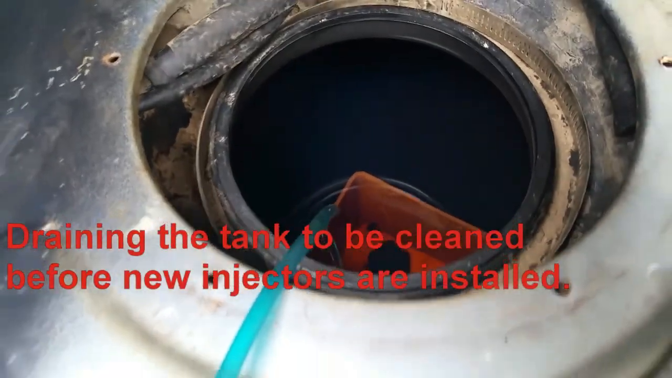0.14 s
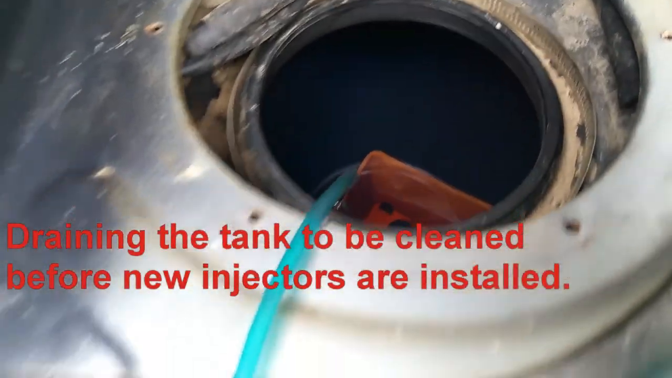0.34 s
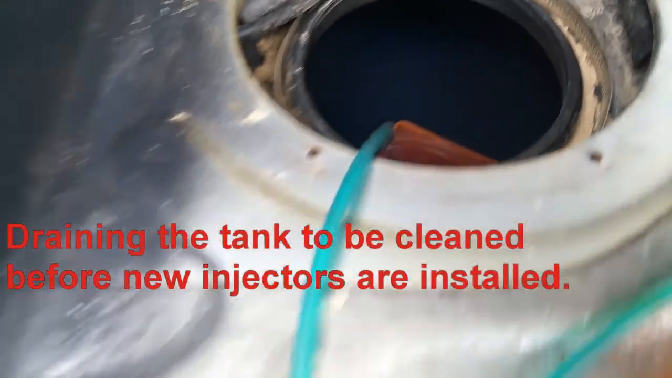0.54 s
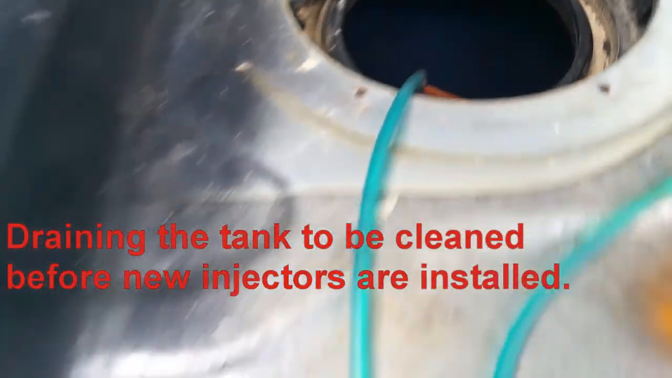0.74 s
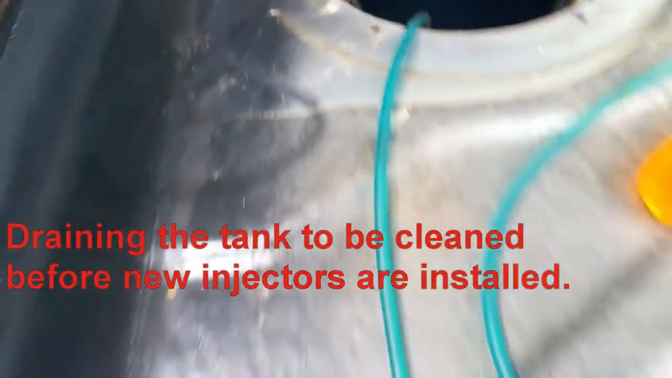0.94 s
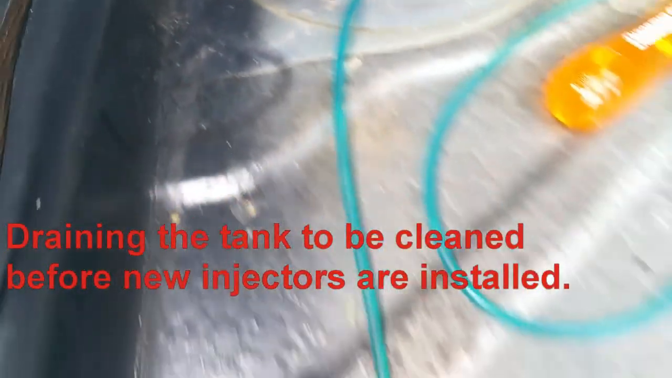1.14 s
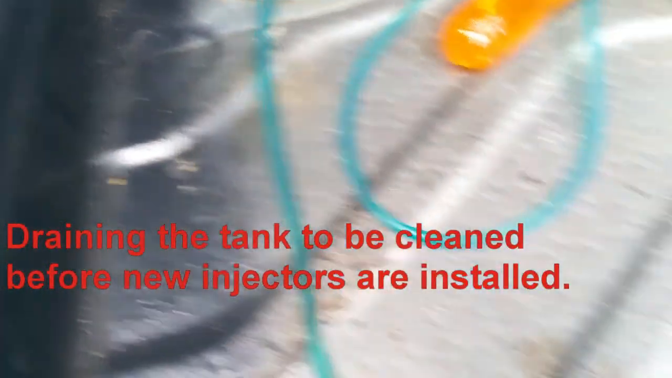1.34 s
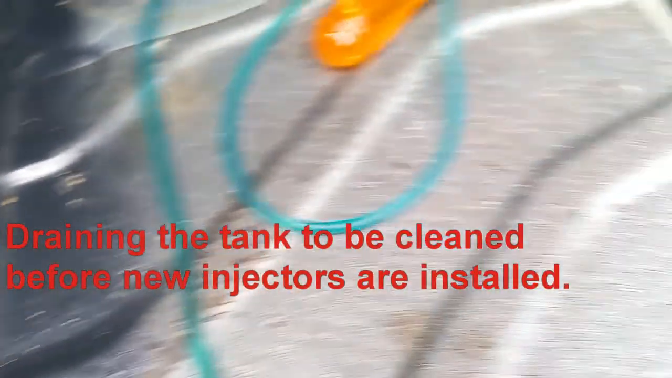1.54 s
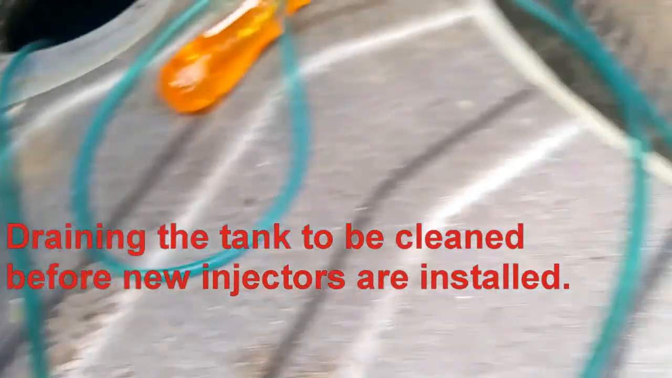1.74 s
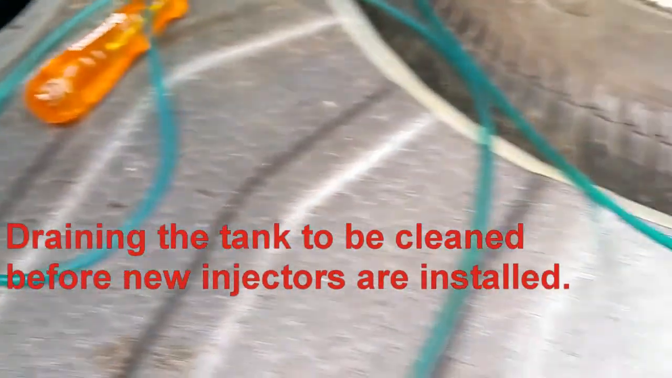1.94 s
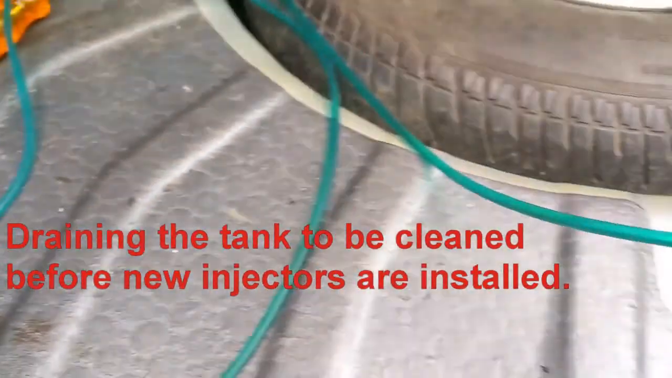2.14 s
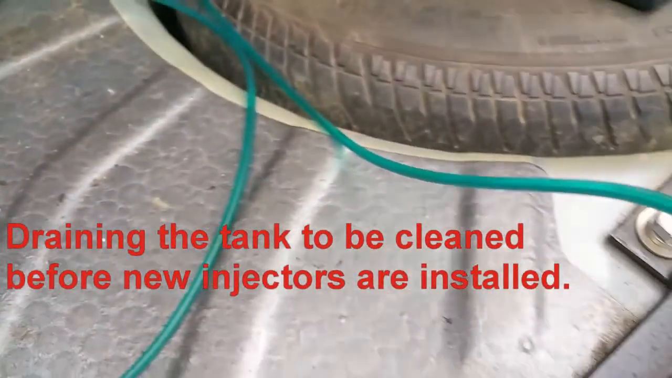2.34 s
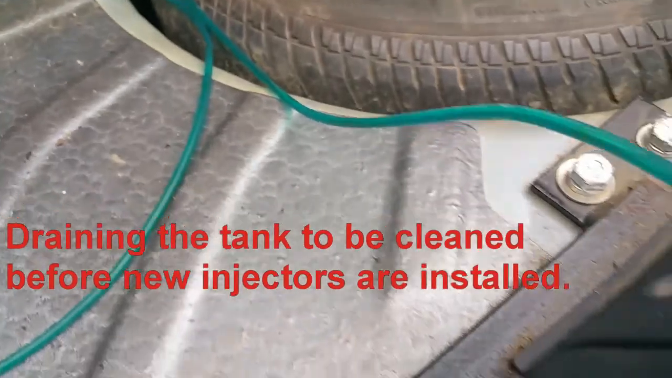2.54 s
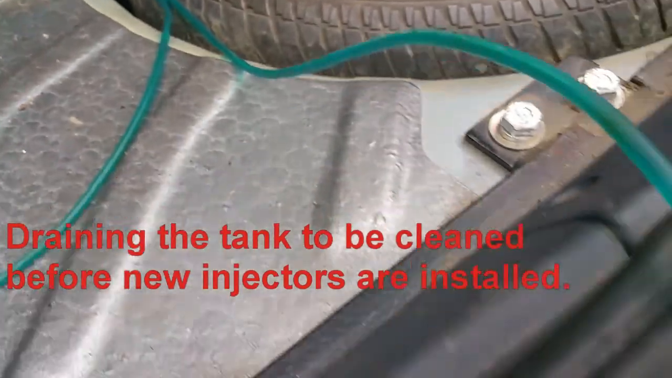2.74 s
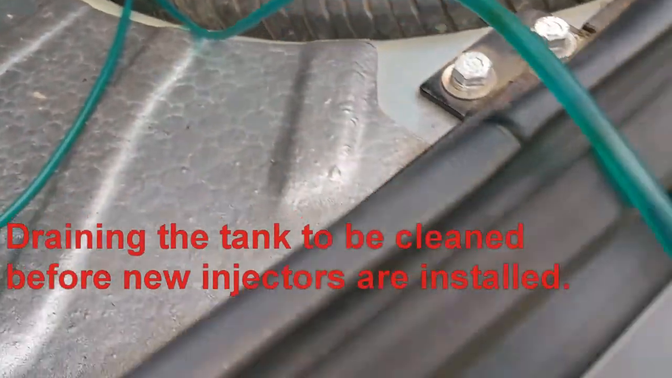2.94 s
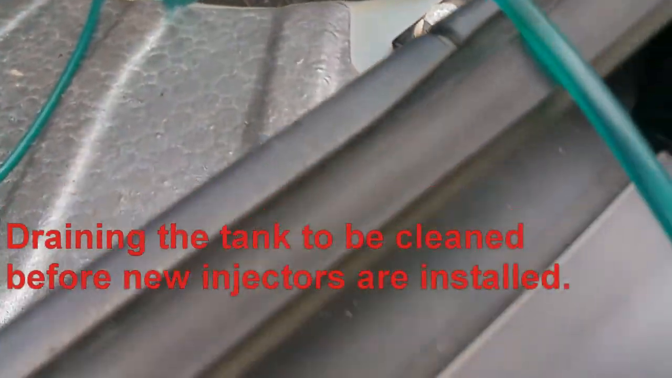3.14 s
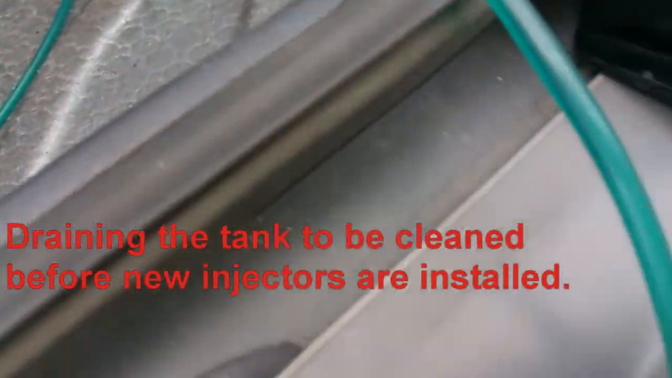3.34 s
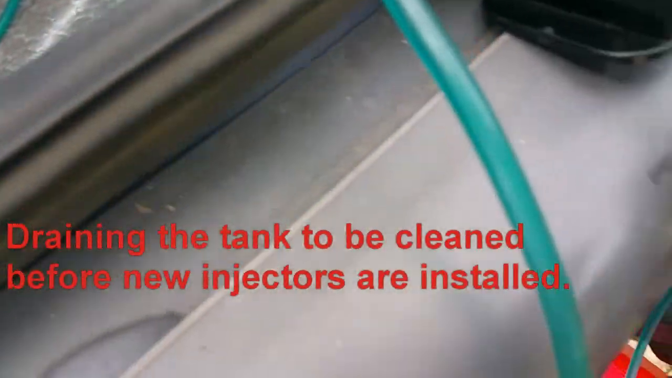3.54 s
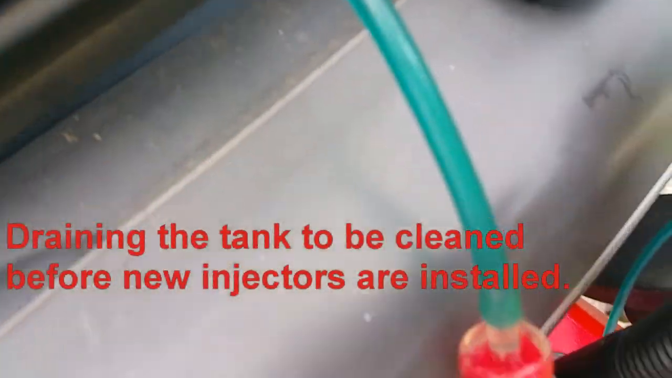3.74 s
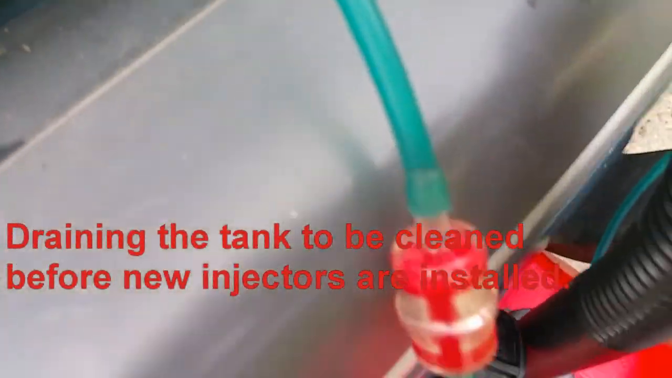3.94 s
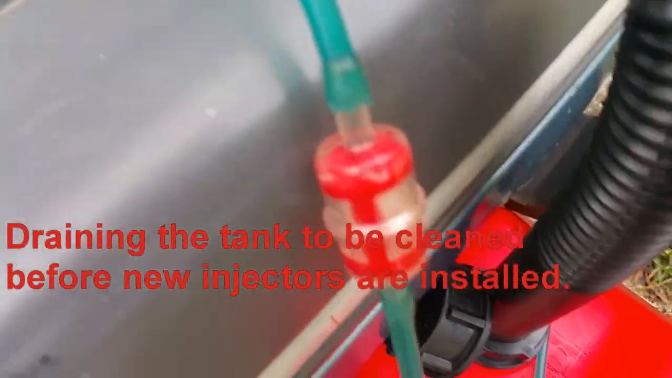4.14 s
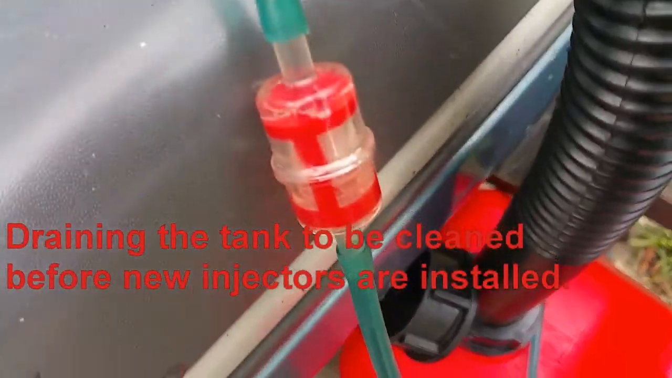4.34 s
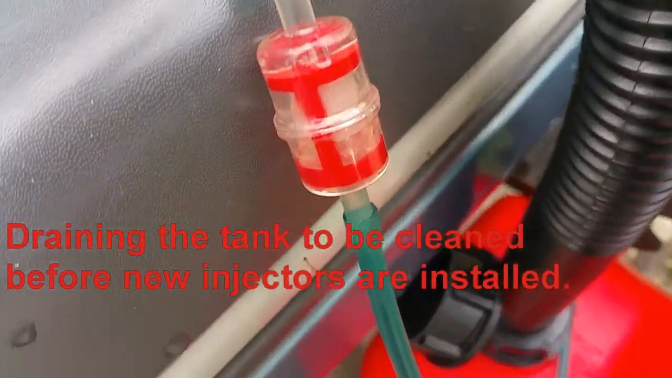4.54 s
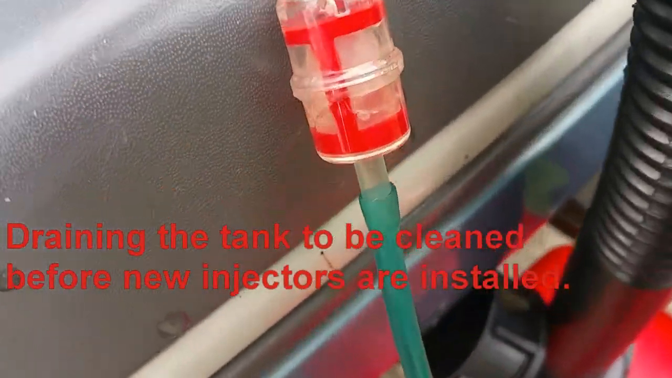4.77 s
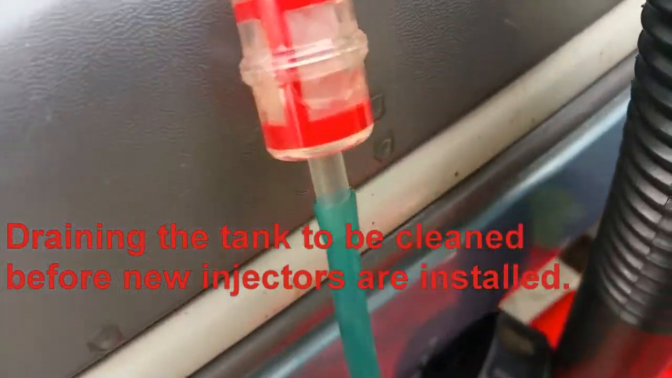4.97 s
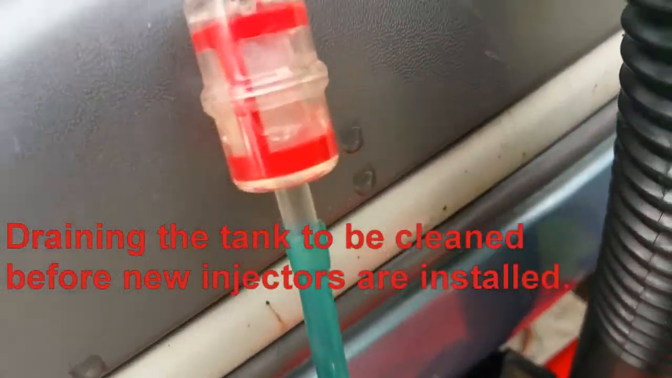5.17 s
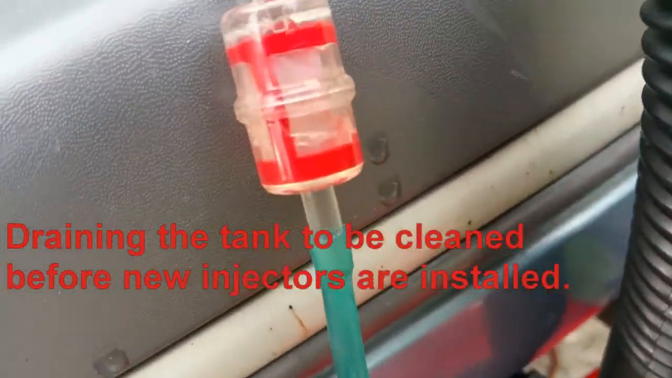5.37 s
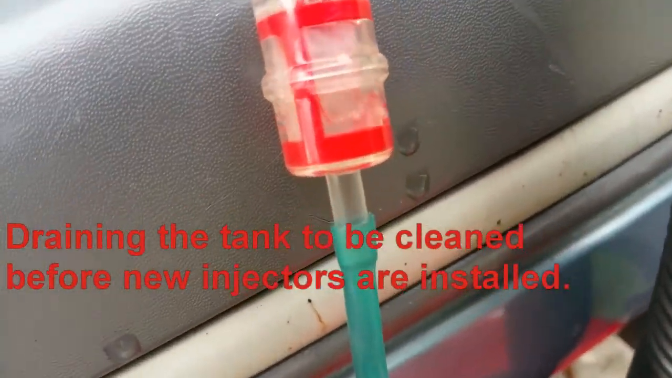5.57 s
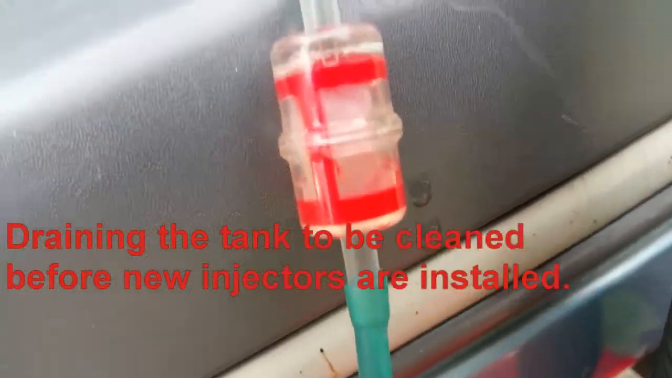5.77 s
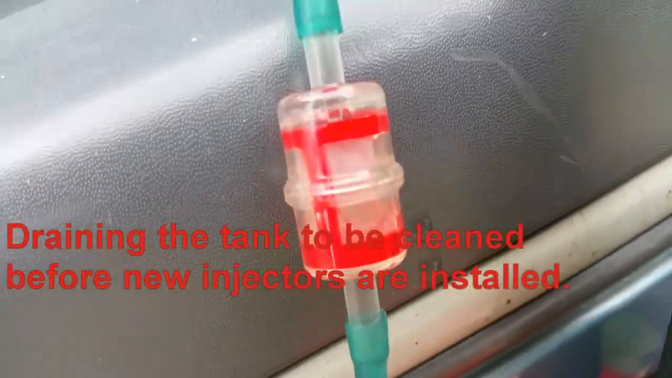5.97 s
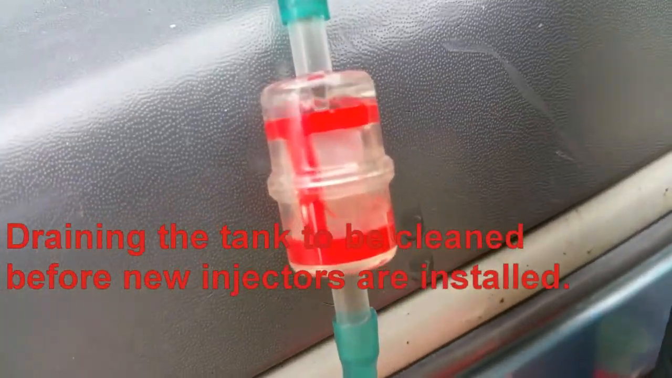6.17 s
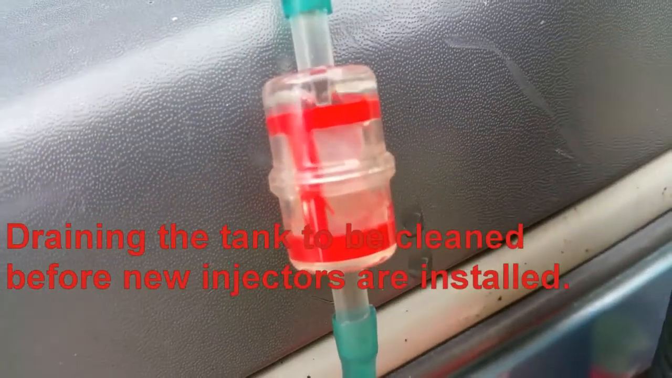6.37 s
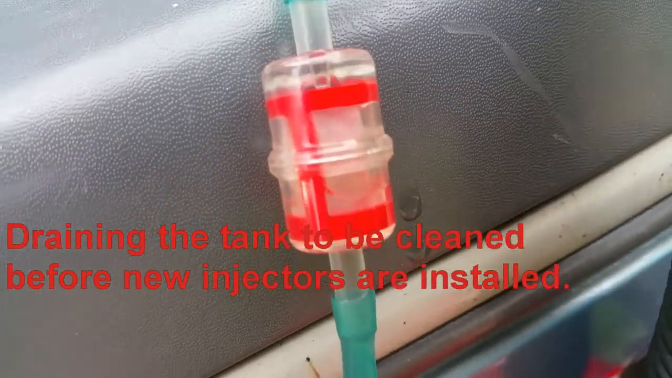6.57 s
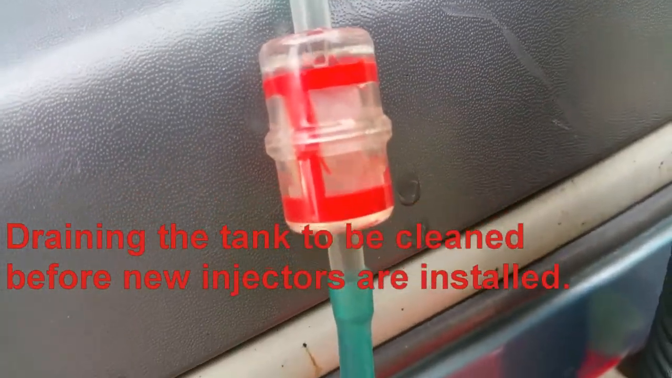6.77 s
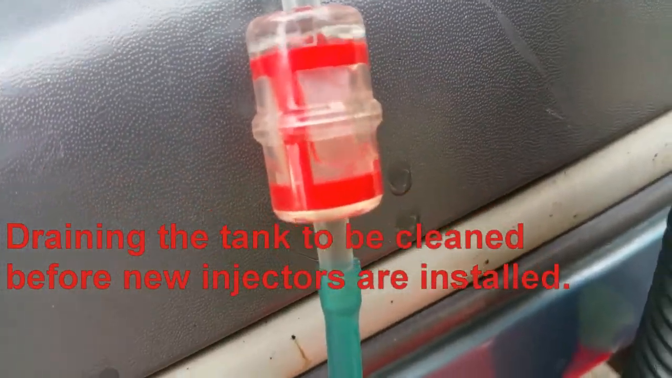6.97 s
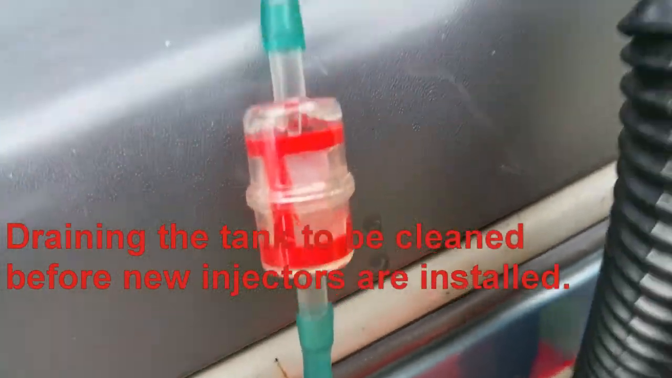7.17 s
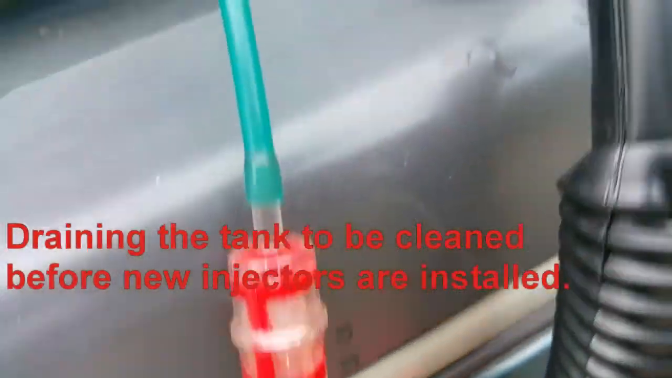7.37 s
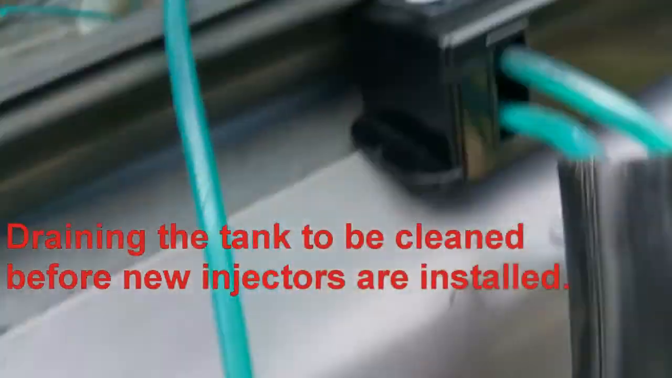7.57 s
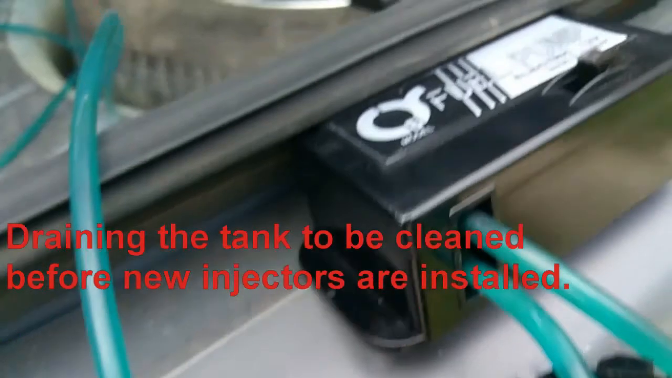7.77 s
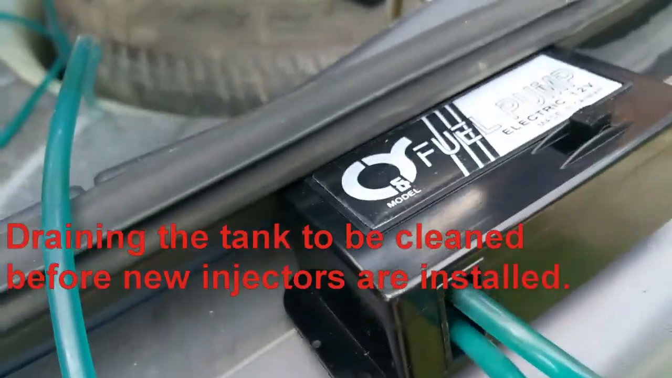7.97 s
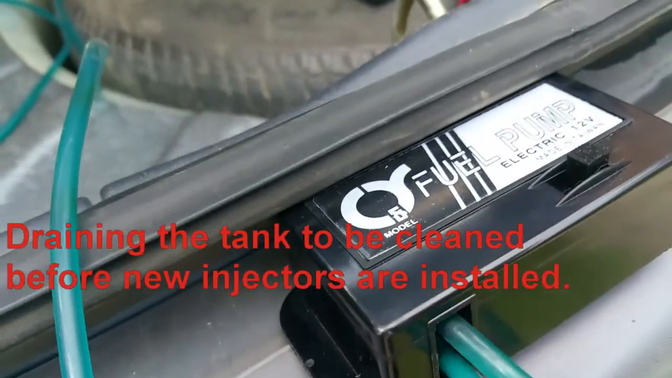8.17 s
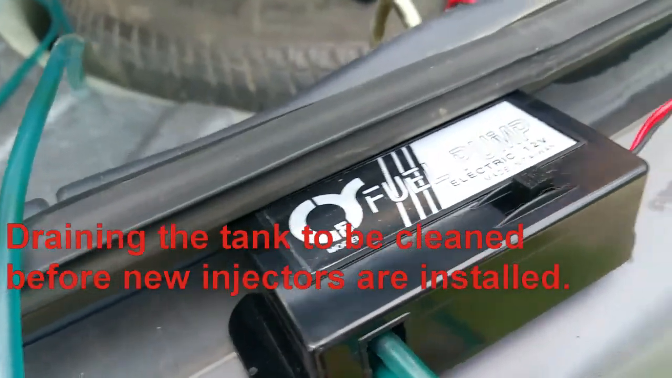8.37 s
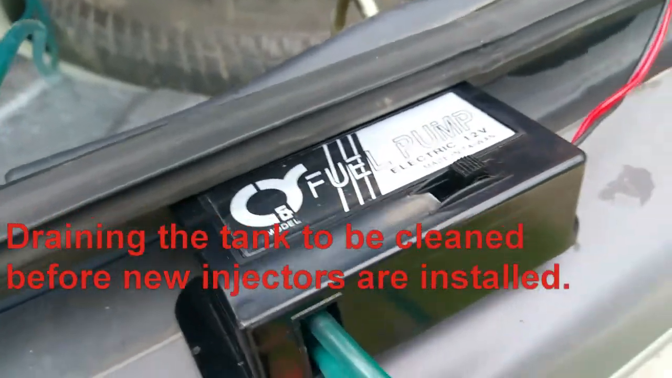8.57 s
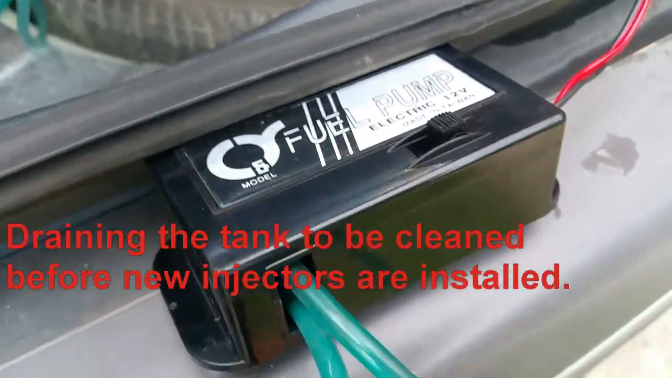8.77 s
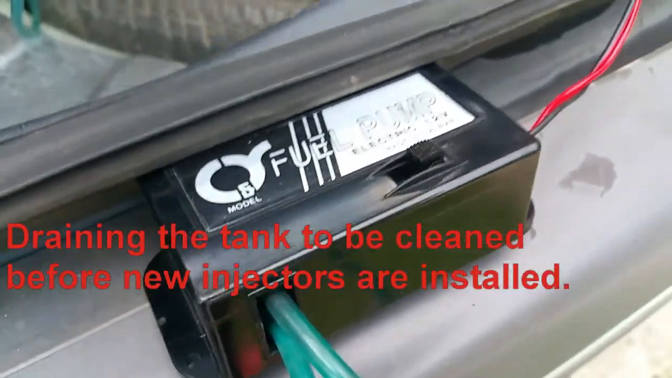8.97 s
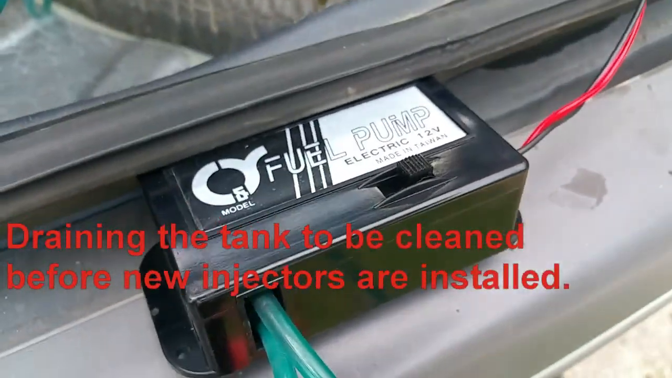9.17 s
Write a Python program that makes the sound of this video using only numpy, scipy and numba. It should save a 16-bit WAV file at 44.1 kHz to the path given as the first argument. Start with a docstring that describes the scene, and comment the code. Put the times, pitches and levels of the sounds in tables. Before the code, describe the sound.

A small electric fuel pump runs throughout, a steady nasal whine with raspy brush and gear noise. It starts dull and quieter near an open tank, wavers as the handheld stereo microphone moves, then turns brighter and louder. Midway it sputters on a few air gulps while a vehicle passes faintly far off. Scattered finger taps knock the microphone; no break in the whine.

```python
"""Electric pump heard on a walk along its hose

A small electric pump whines in its box on a car's sill: a sum of harmonics of the shaft speed, over rasping
brush and gear noise. A handheld two-port microphone is carried from the open tank to the pump, so levels,
port delays and echo fading change; gulps of air race the motor. Fingers tap the microphone as sliding knocks.
Behind lie shaped noise for a vehicle passing far off and a low rumble, and a far engine's sinking tone."""
import sys
import numpy as np
from scipy import signal
from scipy.io import wavfile
from scipy.ndimage import uniform_filter1d
from numba import njit

SR = 44100
rng = np.random.default_rng(int(sys.argv[2]) if len(sys.argv) > 2 else 0)


def log_audio(samples):
    """Write samples as a 16-bit WAV file to the path given in sys.argv[1]."""
    # one column per channel
    frames = np.atleast_2d(samples).T
    # limit to full scale, then quantise
    limited = np.clip(frames, -1, 1)
    pcm = np.round(limited * 32767).astype(np.int16)
    wavfile.write(sys.argv[1], SR, pcm)


N = 406161
HOP = 256  # samples from one control frame to the next
FRAMES = N // HOP + 5
SHAFT_HZ = 244.2  # turns a second under steady load

# shaft orders 25-62, one value an order: (level over the rasp per Hz around it [dB])
HIGH_ORDERS = [28, 26, 24, 28, 31, 30, 28, 24, 29, 28, 20, 28, 27, 28, 29, 22, 32, 26, 27, 26, 25, 25, 27,
               24, 28, 26, 25, 21, 21, 21, 20, 26, 27, 24, 23, 18, 19, 18]


def whine():
    """Harmonic synthesis: shaft orders 1-62 add up, each with its own multipath fading at each port."""
    low = low_orders() + swells()
    high_hz = SHAFT_HZ * np.arange(25, 63)
    high_db = on_the_walk([read(p, high_hz) for p in PLACES_RASP]) + np.array(HIGH_ORDERS)[:, None]
    db = np.concatenate([low[:2], high_db], 1) + ports_db()
    db[:, 23:] -= 2.0 * np.maximum(2 - place(), 0)  # near the tank and boot floor, orders 24 up are weaker
    order = np.arange(1, 63)[:, None]

    fade_db = fading_depth(db, order)
    db += fade_db * drift(124, 10).reshape(2, 62, -1)
    db -= np.log(10) / 20 * fade_db ** 2  # fading keeps the mean power
    db += .03 * order * drift(124, 3).reshape(2, 62, -1)

    phase = np.repeat(2 * np.pi * rng.random((2, 62, 1)), FRAMES, 2)
    phase[0, :24] = phase[1, :24] + low[2]
    phase += 0.0096 * order * drift(124, 6).reshape(2, 62, -1)
    phase[0] += .17 * fade_db * drift(62, 25)  # the echoes reach the two ports unevenly

    heights = np.sqrt(2) * gain_of(db) * np.exp(1j * phase)
    return stack(shaft_turns() % 1, np.ascontiguousarray(heights.transpose(2, 0, 1)), HOP)


# the load in the hose drags the motor or lets it go: (time [s], change of shaft speed [Hz])
SPEED = [(0, 0), (1.7, 0), (2.15, .5), (2.6, -.5), (3.2, -.7), (3.55, .2), (4.5, .1), (5.1, -.2), (5.2, .3),
         (5.7, .3), (5.95, -.4), (6.6, .2), (7.1, .2), (7.55, -.7), (8.4, -.3), (8.7, .1), (9.21, 0)]
RACE_HZ, RACE_S = 1.2, .06  # speed gained on a gulp of size 1, and its decay time
WANDER_HZ = .2  # rms of the motor's constant slow hunting


def shaft_turns():
    """Phase is the integral of frequency: load, air gulps and hunting set the shaft speed."""
    hz = SHAFT_HZ + along(SPEED)[0] + RACE_HZ * gulps(RACE_S) + WANDER_HZ * drift(1, 12)[0]
    hz += (.4 + 2.5 * gulps()) * drift(1, 3)[0]  # quick jitter; the motor stumbles on air
    return np.cumsum(np.interp(np.arange(N), np.arange(FRAMES) * HOP, hz)) / SR


# air passing through the gears: (time [s], size [0-1])
GULPS = [(5.15, 0.97), (5.315, 0.99), (5.51, 0.47), (5.69, 1)]


def gulps(dies_s=.03):
    """Exponential relaxation: rises at once with each gulp of air and dies away."""
    t = frame_times()
    return sum(size * (t >= s) * np.exp(-np.maximum(t - s, 0) / dies_s) for s, size in GULPS)


# shaft orders 1-24 as heard from each place, a row an order:
# (left level [dB], right level [dB], left phase lead [rad])
TANK_ORDERS = [(-46.5, -45.0, -0.0), (-49.0, -52.5, -1.5), (-52.5, -53.0, 0.7), (-61.5, -63.0, -1.9),
               (-62.5, -53.0, -1.4), (-47.5, -48.0, 2.8), (-68.0, -64.0, 1.0), (-61.5, -63.5, -1.6),
               (-56.0, -49.5, 1.4), (-55.0, -56.0, 0.3), (-58.5, -57.5, -1.5), (-45.5, -50.5, -0.7),
               (-64.0, -62.0, 2.0), (-62.0, -60.5, 1.1), (-54.0, -62.5, -0.6), (-60.5, -56.0, 1.4),
               (-59.5, -47.5, -2.2), (-63.5, -62.0, -2.0), (-59.0, -61.5, 0.7), (-58.5, -58.5, -3.4),
               (-63.0, -63.0, -1.8), (-62.5, -57.5, -2.3), (-64.0, -66.5, 0.6), (-66.5, -58.5, 0.9)]
FLOOR_ORDERS = [(-44.0, -43.5, -0.1), (-50.0, -53.5, 2.3), (-49.5, -45.0, -0.8), (-54.0, -51.5, -1.3),
                (-64.0, -61.5, -0.5), (-45.0, -40.5, 4.9), (-67.5, -63.5, -2.1), (-63.0, -58.5, -1.7),
                (-58.5, -50.5, -1.2), (-50.5, -59.0, 2.2), (-56.5, -57.5, 2.0), (-51.5, -49.5, 0.4),
                (-58.0, -59.5, -0.2), (-59.5, -58.5, 0.3), (-55.5, -54.0, 1.7), (-55.5, -56.0, 1.4),
                (-50.5, -49.5, 0.3), (-60.0, -58.0, 1.5), (-54.0, -53.5, -1.0), (-61.0, -61.0, 0.7),
                (-60.0, -60.0, 2.4), (-56.0, -59.0, -4.5), (-60.0, -59.5, 2.1), (-63.0, -56.5, -1.1)]
SILL_ORDERS = [(-43.5, -40.5, 0.5), (-46.0, -47.5, -1.3), (-47.5, -52.5, 1.6), (-48.0, -46.0, 0.3),
               (-60.0, -55.5, -0.6), (-38.5, -33.5, 5.3), (-57.5, -51.5, -3.4), (-48.0, -37.5, 0.9),
               (-41.5, -30.5, 0.5), (-41.0, -37.5, -0.4), (-50.0, -40.5, -2.0), (-42.5, -34.5, 4.1),
               (-47.0, -59.0, 3.3), (-48.5, -58.5, -0.0), (-41.5, -45.0, 3.1), (-42.0, -54.5, 1.7),
               (-43.0, -46.5, -2.8), (-48.5, -55.0, 2.7), (-46.0, -40.5, 0.1), (-53.0, -56.5, -3.8),
               (-53.5, -57.5, -0.0), (-47.5, -56.0, -6.5), (-51.0, -55.5, 5.5), (-59.0, -53.5, 2.9)]
HOSE_ORDERS = [(-40.5, -38.0, 0.4), (-48.0, -53.0, -0.0), (-61.5, -45.5, 3.5), (-53.5, -47.5, 1.8),
               (-50.5, -45.0, 1.0), (-38.5, -36.5, 8.2), (-58.0, -47.0, -2.6), (-46.0, -34.5, 2.2),
               (-44.5, -30.5, 3.1), (-39.5, -43.5, 3.6), (-53.0, -42.5, -3.3), (-35.0, -38.0, 3.5),
               (-44.5, -54.0, 1.5), (-47.5, -60.0, -3.4), (-34.5, -40.5, 3.8), (-39.0, -51.0, -0.7),
               (-37.5, -47.0, 0.4), (-49.5, -56.0, 1.5), (-37.0, -50.0, 1.4), (-46.5, -60.0, -3.0),
               (-43.0, -60.0, 3.7), (-41.0, -56.5, -8.9), (-48.0, -52.0, 3.9), (-53.5, -58.5, -1.0)]
FILTER_ORDERS = [(-38.0, -38.0, 0.2), (-50.0, -58.5, -0.7), (-56.0, -43.0, 5.6), (-54.5, -50.0, 0.8),
                 (-50.0, -46.5, 0.3), (-41.0, -43.0, 7.8), (-61.5, -47.0, -4.0), (-46.5, -33.5, 1.6),
                 (-44.5, -33.5, 2.6), (-42.5, -51.5, 2.8), (-55.0, -38.5, -3.4), (-29.5, -40.0, 2.8),
                 (-52.0, -59.5, -0.6), (-46.0, -57.0, -5.1), (-36.5, -51.0, 5.7), (-42.5, -57.5, 0.5),
                 (-43.0, -44.5, 0.1), (-54.5, -53.0, 0.8), (-38.5, -50.5, 4.0), (-51.0, -54.0, -2.2),
                 (-42.0, -59.5, 5.7), (-41.0, -57.5, -8.9), (-47.5, -58.0, 1.9), (-51.5, -47.5, -1.0)]
PUMP_ORDERS = [(-40.0, -41.0, 0.2), (-49.0, -49.5, -0.2), (-54.0, -45.0, 8.6), (-49.0, -49.5, 0.9),
               (-59.0, -56.5, 0.4), (-37.0, -33.0, 8.4), (-56.0, -47.0, -4.1), (-45.0, -34.5, 2.2),
               (-36.5, -31.5, 3.7), (-43.5, -39.0, 3.9), (-42.5, -35.5, -2.7), (-33.0, -30.5, 4.4),
               (-48.5, -53.5, -3.3), (-42.5, -60.5, -3.9), (-36.0, -52.0, 4.5), (-37.0, -59.5, 3.6),
               (-35.5, -53.0, 3.1), (-46.0, -52.5, 0.4), (-34.5, -47.5, 2.7), (-46.0, -54.0, -2.8),
               (-49.5, -55.5, 4.0), (-50.5, -60.5, -10.2), (-52.5, -60.0, 3.2), (-58.5, -50.5, -1.5)]
PLACES_ORDERS = TANK_ORDERS, FLOOR_ORDERS, SILL_ORDERS, HOSE_ORDERS, FILTER_ORDERS, PUMP_ORDERS


def low_orders():
    """Time delay as phase: turning the ports adds a lead in phase that grows with frequency."""
    low = on_the_walk(PLACES_ORDERS).transpose(1, 0, 2)  # left dB, right dB, left lead
    lead_s = along(WALK)[3] * 1e-6
    low[2] += 2 * np.pi * SHAFT_HZ * np.arange(1, 25)[:, None] * lead_s
    return low


# single orders briefly get louder or softer and shift between left and right: (time [s], order,
# half length to 1/e [s], left change [dB], right change [dB], left phase lead [rad])
SWELLS = [(0.09, 13, 0.2, 9, -2, 1.9), (0.14, 10, 0.2, 0, 8, -0.9), (0.19, 6, 0.13, 2, -13, -2.6),
          (0.56, 11, 0.08, 9, -12, 2.5), (0.74, 15, 0.2, 2, 11, 0.1), (0.79, 17, 0.13, 6, -5, -1.6),
          (0.84, 4, 0.2, 6, 9, 0.6), (0.88, 3, 0.13, -1, -13, -0.6), (0.88, 12, 0.08, 4, -9, 2.5),
          (1.02, 2, 0.13, 4, -2, -2.6), (1.02, 9, 0.13, 6, 2, 1.6), (1.07, 5, 0.3, 6, 10, 1.4),
          (1.07, 6, 0.3, -8, 2, 1.6), (1.21, 10, 0.13, -13, -1, -0.9), (1.35, 11, 0.3, 4, 7, -0.3),
          (1.58, 12, 0.13, 8, 4, 0.9), (1.67, 10, 0.2, 8, 3, 0.7), (1.86, 19, 0.15, 5, 3, -0.6),
          (1.9, 17, 0.13, -2, -3, 2.5), (1.95, 11, 0.13, 8, 1, 2.0), (2.04, 9, 0.13, 5, -3, -2.3),
          (2.37, 2, 0.2, -4, -4, -2.1), (2.51, 17, 0.08, 6, 5, 2.5), (2.55, 5, 0.2, 5, 11, -0.8),
          (2.69, 9, 0.3, 4, 1, -0.7), (2.74, 3, 0.13, 3, 9, -1.0), (2.4, 11, 0.25, -5, -7, 0),
          (2.79, 12, 0.13, -9, -8, -2.2), (2.97, 17, 0.2, 2, 3, -2.0), (3.2, 9, 0.2, 7, 4, 0.7),
          (3.25, 8, 0.2, 1, 7, 1.6), (3.53, 15, 0.3, 4, 2, 1.0), (4.95, 15, 0.15, 2, 0, 0),
          (3.1, 15, 0.1, 6, -4, 0), (4.97, 16, 0.13, -10, 2, -2.5), (5.11, 15, 0.08, 2, -8, -2.6),
          (3.7, 12, 0.2, -1, 4, 0), (7.52, 15, 0.45, 2, 0, 2.0), (7.52, 16, 0.45, -2, 12, -1.5),
          (8.87, 17, 0.3, 2, 6, 1.4)]


def swells():
    """Gaussian envelopes: single orders of 1-24 briefly change in left dB, right dB and left lead."""
    t = frame_times()
    out = np.zeros((3, 24, FRAMES))
    for s, order, half_s, *change in SWELLS:
        out[:, round(order) - 1] += np.outer(change, np.exp(-((t - s) / half_s) ** 2))
    return out


# rms fading before the weighting by order: hand still [dB], added among the boot's echoes [dB],
# added per place a second of movement [dB]
STILL_DB, BOOT_DB, MOVING_DB = .8, 2.8, .35
STEADIED = .06  # share of the fading lost per dB that an order stands over its neighbours
DEEPEST_DB = 4.2  # limit on the rms fading of an order


def fading_depth(db, order):
    """Multipath interference: rms dB of fading, weaker for long waves and for strong direct paths."""
    pace = uniform_filter1d(abs(np.gradient(place())) * SR / HOP, size=50)
    depth = STILL_DB + BOOT_DB * np.clip(2 - place(), 0, 1) + MOVING_DB * pace
    depth = depth * np.clip(order / 9, .15, 1 + order / 25)
    prominence = (db - uniform_filter1d(db, size=5, axis=1)).mean(0)
    depth *= np.clip(1 - STEADIED * prominence, .4, 1.4)
    return np.minimum(depth, DEEPEST_DB)


@njit
def stack(turns, heights, hop):
    """Fourier series: sums the shaft orders, each with its slowly changing complex height."""
    out = np.zeros((2, len(turns)))
    for i in range(len(turns)):
        j, u = i // hop, (i % hop) / hop
        step = np.exp(2j * np.pi * turns[i])
        z = step  # each multiplication by step reaches the next order
        for k in range(heights.shape[2]):
            for c in range(2):
                out[c, i] += (z * ((1 - u) * heights[j, c, k] + u * heights[j + 1, c, k])).real
            z *= step
    return out


# rasp of brushes and gears as heard from each place:
# (frequency [Hz], left density [dB per Hz], right density [dB per Hz])
TANK_RASP = [(230, -100, -96), (370, -87, -85), (610, -89, -92), (850, -82, -79), (1100, -92, -90),
             (1340, -83, -74), (1590, -80, -83), (1830, -87, -84), (2080, -89, -88), (2320, -91, -85),
             (2560, -81, -89), (3050, -83, -82), (3540, -83, -81), (4030, -87, -87), (4520, -90, -87),
             (5010, -84, -87), (5490, -92, -90), (5980, -95, -96), (6720, -98, -96), (7690, -94, -103),
             (8910, -98, -106), (10130, -102, -109), (11600, -105, -111), (14040, -106, -114),
             (15020, -109, -125)]
FLOOR_RASP = [(230, -91, -90), (370, -87, -87), (610, -86, -86), (850, -79, -77), (1100, -89, -83),
              (1340, -78, -72), (1590, -77, -74), (1830, -85, -83), (2080, -88, -85), (2320, -82, -81),
              (2560, -80, -82), (3050, -80, -82), (3540, -85, -86), (4030, -87, -84), (4520, -89, -86),
              (5010, -86, -84), (5490, -87, -87), (5980, -97, -92), (6720, -98, -95), (7690, -94, -102),
              (8910, -100, -107), (10130, -104, -107), (11600, -105, -111), (14040, -106, -116),
              (15020, -106, -121)]
SILL_RASP = [(230, -84, -79), (370, -88, -87), (610, -89, -89), (850, -75, -72), (1100, -81, -79),
             (1340, -75, -71), (1590, -69, -63), (1830, -75, -70), (2080, -78, -65), (2320, -71, -64),
             (2560, -74, -67), (3050, -71, -75), (3540, -73, -82), (4030, -74, -80), (4520, -79, -79),
             (5010, -79, -81), (5490, -80, -85), (5980, -90, -85), (6720, -94, -90), (7690, -87, -101),
             (8910, -90, -99), (10130, -93, -95), (11600, -94, -101), (14040, -95, -108),
             (15020, -94, -115)]
HOSE_RASP = [(230, -74, -71), (370, -88, -87), (610, -87, -87), (850, -76, -76), (1100, -82, -78),
             (1340, -75, -73), (1590, -72, -66), (1830, -76, -70), (2080, -78, -66), (2320, -72, -68),
             (2560, -68, -69), (3050, -64, -71), (3540, -68, -77), (4030, -73, -81), (4520, -74, -82),
             (5010, -74, -81), (5490, -73, -81), (5980, -88, -86), (6720, -80, -90), (7690, -85, -104),
             (8910, -90, -103), (10130, -91, -101), (11600, -90, -101), (14040, -96, -105),
             (15020, -92, -113)]
FILTER_RASP = [(230, -76, -73), (370, -88, -87), (610, -87, -87), (850, -76, -76), (1100, -80, -73),
               (1340, -76, -73), (1590, -72, -67), (1830, -80, -70), (2080, -80, -66), (2320, -73, -71),
               (2560, -68, -70), (3050, -65.5, -76), (3540, -70.5, -80), (4030, -76, -80), (4520, -74, -82),
               (5010, -70, -79), (5490, -73, -84), (5980, -87, -86), (6720, -83, -90), (7690, -83, -104),
               (8910, -94, -100), (10130, -93, -96), (11600, -92, -100), (14040, -96, -105),
               (15020, -99, -109)]
PUMP_RASP = [(230, -86, -80), (370, -87, -87), (610, -88, -89), (850, -76, -77), (1100, -85, -80),
             (1340, -74, -68), (1590, -72, -68), (1830, -79, -70), (2080, -73, -65), (2320, -68, -68),
             (2560, -68, -67), (3050, -66, -68), (3540, -71, -78), (4030, -73, -75), (4520, -69, -79),
             (5010, -73, -79), (5490, -77, -82), (5980, -86, -84), (6720, -84, -90), (7690, -87, -104),
             (8910, -85, -98), (10130, -88, -100), (11600, -94, -102), (14040, -90, -106),
             (15020, -94, -119)]
PLACES_RASP = TANK_RASP, FLOOR_RASP, SILL_RASP, HOSE_RASP, FILTER_RASP, PUMP_RASP
# coherence of the rasp at the two ports: (frequency [Hz], left-right likeness [0-1])
RASP_SAME = [(200, .95), (600, .7), (1000, .6), (1500, .9), (2300, .7), (3000, .7), (4000, .55),
             (5000, .65), (8000, .3)]
RING_HZ, RING_WIDTH_HZ, RING_DB = 1607, 100, 6  # the pump's box rings; half width to 1/e of the dB


def rasp(hz):
    """Filtered noise: brush and gear noise takes the same paths to the ports as the nearest order."""
    nearest = np.clip(np.round(hz / SHAFT_HZ).astype(int) - 1, 0, 23)
    to_the_top = [p + [(SR / 2, *p[-1][1:])] for p in PLACES_RASP]
    db = on_the_walk([read(p, hz) for p in to_the_top]) + ports_db()

    # the level drifts slowly at random, in bands of nine bins
    patches = np.repeat(drift(114, 40).reshape(2, 57, -1), 9, axis=1)
    db += (0.65 + 1.5 * (hz > 5500))[:, None] * patches
    # froth spits in the gears
    db += 7.4 * gulps() * np.exp(-(np.log((hz + 1) / 4800) / 1.3) ** 2)[:, None]
    # the rasp swells with its order
    db += .4 * uniform_filter1d(swells()[:2, nearest], size=5, axis=1)
    # the box's ring comes in once the boot is left
    ring = np.exp(-((hz - RING_HZ) / RING_WIDTH_HZ) ** 2)[:, None]
    db += RING_DB * ring * np.clip(place() - 2, 0, 1)
    db -= 24 * np.maximum(np.log2(200 / (hz + 1)), 0)[:, None]  # little below the shaft speed

    lead = np.exp(1j * low_orders()[2, nearest])
    return noise(db, read(RASP_SAME, hz).T, lead, patchy_db=1.2)


# the microphone's walk: (time [s], place [0 tank, 1 boot floor, 2 sill, 3 hose, 4 filter, 5 pump; held at 5],
# nearness [dB], turn left over right [dB], left lead [us])
WALK = [(0, 0.5, -1.5, 1.5, 30), (.5, 0, 0.5, 0.5, 2), (.85, 0.28, -2, 2, 13), (1.02, 1.12, -3, 1.5, 37),
        (1.5, 1, -1.5, 1, -4), (2, 0.87, 0.6, -0.5, 0), (2.4, 0.96, 3, -2, 21), (2.75, 1.75, 0.3, 0.5, -15),
        (3.1, 1.7, 2.6, -4, -18), (3.5, 2, -0.5, 0.5, -1), (3.9, 2.5, 1.3, 1, 20),
        (4.3, 2.95, 0.1, 0.5, -2), (4.8, 3, -0.5, 1, 2), (5.5, 4, 0, -0.5, 24), (7, 4, 0.46, -0.5, -5),
        (7.5, 4.5, 0, 0, -47), (8, 5.5, .5, -.5, -11), (8.5, 7, -.5, 0, -1), (9.21, 5, -0.5, 0.5, 64)]


def place():
    """Receiver position: where the microphone is, at the frame times."""
    return np.clip(along(WALK)[0], 0, len(PLACES_RASP) - 1)


def ports_db():
    """Distance and directivity: nearness lifts both ports, turning shares level between them."""
    near_db, turn_db = along(WALK)[1:3]
    return np.array([near_db + turn_db / 2, near_db - turn_db / 2])[:, None]


def on_the_walk(tables):
    """Linear interpolation between places as the microphone moves; time is the last axis."""
    share = np.maximum(1 - abs(place() - np.arange(len(tables))[:, None]), 0)
    return np.tensordot(np.array(tables), share, (0, 0))


# finger taps on the microphone body: (time [s], level [dB], left over right [dB],
# approximate starting pitch [Hz], ring [0-1])
TAPS = [(0.9645, -45, -14, 1200, 0), (1.0790, -35.5, -18, 1550, 0), (2.5990, -37, -5, 2400, 0),
        (3.0465, -35, 0, 1700, .5), (3.0595, -35, 0, 1300, 1), (5.32, -37, -12, 1300, 0),
        (7.9058, -37.5, -24, 1200, 0), (9.127, -46, 0, 1200, 1)]


def taps():
    """Damped oscillation: a short knock slides quickly down to a fifth; some ring the hollow body."""
    out, t = np.zeros((2, N)), np.arange(800) / SR
    for s, db, pan_db, hz, rings in TAPS:
        turns = hz * (t / 5 + .001 * (1 - np.exp(-t / .0012)))
        envelope = np.sqrt(t / .0005) * np.exp(.5 - t / .0015 - (t / .005) ** 4)
        knock = np.sin(2 * np.pi * turns) * envelope
        ring = rings * np.sin(2 * np.pi * 660 * t) * np.exp(-t / .008)
        at = round(s * SR)
        ports_gain = gain_of(db + np.array([[pan_db / 2], [-pan_db / 2]]))
        out[:, at:at + len(t)] += ports_gain * (knock + ring)
    return out


# a vehicle passing far off: (time [s], level [dB])
PASSING = [(3.9, -67.5), (4.3, -57), (4.8, -49.5), (5.302, -46.5), (5.8, -48), (6.3, -46.5), (6.8, -45.5),
           (7.2, -52), (7.7, -67)]
# its spectrum: (frequency [Hz], relative density [dB])
PASSING_COLOUR = [(80, -33), (150, 2.5), (220, -3), (380, 5.5), (550, 0), (750, 3.5), (1000, -2.5),
                  (1600, -70), (3000, -51)]


def passing_vehicle(hz):
    """Broadband noise source: coloured noise rises and falls as a far vehicle passes."""
    return outdoors(hz, PASSING, PASSING_COLOUR, same=0.92, patchy_db=-0.5)


# low rumble of the yard: (time [s], level [dB])
RUMBLE = [(0, -63), (.7, -65), (1.3, -58), (2, -64), (2.6, -59.5), (3.4, -57), (3.7, -60), (4.1, -53),
          (4.6, -55), (5.2, -49), (5.9, -47.5), (6.4, -53), (6.9, -61), (7.6, -63), (8.4, -64), (9.21, -63)]
# its spectrum: (frequency [Hz], relative density [dB])
RUMBLE_COLOUR = [(20, -25), (43, -21), (70, -1), (92, -6), (124, -4.5), (160, -30), (200, -1), (260, -13.5),
                 (440, -80)]


def rumble(hz):
    """Low-frequency ambient noise: the yard's coloured noise on a moving level."""
    return outdoors(hz, RUMBLE, RUMBLE_COLOUR, same=0.92, patchy_db=3.0)


# a far engine's drone: (time [s], frequency [Hz], level [dB])
DRONE = [(0, 56, -68), (1, 54, -70), (1.5, 53, -70), (2.5, 52, -64), (3.4, 51, -66), (4.5, 50, -66),
         (5.5, 47, -64), (7, 45, -71), (9.21, 44, -76)]


def drone():
    """Frequency and amplitude modulation: a far engine's one low tone wavers and sinks as it leaves."""
    hz, db = along(DRONE)
    at, frames = np.arange(N) / HOP, np.arange(FRAMES)
    turns = np.cumsum(np.interp(at, frames, hz + .6 * drift(1, 25)[0])) / SR
    gain = np.interp(at, frames, gain_of(db + 1.8 * drift(1, 30)[0]))
    return np.sqrt(2) * gain * np.sin(2 * np.pi * turns)


def outdoors(hz, level, colour, same, patchy_db):
    """Partial coherence: smooth far noise on a level curve, nearly alike in both ports."""
    level_db = np.interp(np.arange(N) / SR, *np.transpose(level))
    return gain_of(level_db) * evened(noise(read(colour, hz).T, same, 1, patchy_db))


def noise(db, same, lead, patchy_db):
    """Inverse short-time Fourier transform of random two-port spectra; db is channels x bins x frames."""
    a, b, c, d, patches = rng.standard_normal((FRAMES, 513, 5)).T
    patches = evened(uniform_filter1d(uniform_filter1d(patches, 10, 0), 14, 1))
    same = np.clip(same, 0, 1)
    left, other = a + 1j * b, c + 1j * d
    z = np.array([left * lead, same * left + np.sqrt(1 - same ** 2) * other])
    per_hz = np.sqrt(SR * 1.5 / 1024)  # density to bin height
    spectra = z * per_hz * gain_of(db + patchy_db * patches)
    return signal.istft(spectra, nperseg=1024, noverlap=768)[1][:, :N]


def drift(rows, frames_wide):
    """Low-pass random process: slow chance of rms 1 at the frame times."""
    z = rng.standard_normal((FRAMES, rows)).T
    return evened(uniform_filter1d(uniform_filter1d(z, frames_wide), frames_wide))


def gain_of(db):
    """Decibel law: level to amplitude gain."""
    return 10 ** (np.asarray(db) / 20)


def evened(x):
    """Power normalisation: scales to rms 1."""
    return x / np.sqrt(np.mean(x ** 2) + 1e-20)


def read(points, hz):
    """Logarithmic frequency scale: each column of a spectrum at hz."""
    f, *columns = np.transpose(points)
    return np.array([np.interp(np.log(hz + 1), np.log(f + 1), c) for c in columns])


def frame_times():
    """Uniform sampling: the control frames' times in seconds."""
    return np.arange(FRAMES) * HOP / SR


def along(rows):
    """Linear interpolation in time: each column of a curve at the frame times."""
    s, *columns = np.transpose(rows)
    return [np.interp(frame_times(), s, c) for c in columns]


def scene():
    """Superposition: pump, handling and yard add up."""
    hz = np.fft.rfftfreq(1024, 1 / SR)
    pump = whine() + rasp(hz)
    yard = passing_vehicle(hz) + rumble(hz) + drone()
    return pump + taps() + yard


CUT_S, CUT_HZ, CUT_DB = 3.5, 350, -6.5  # the recorder's bass below CUT_HZ drops from CUT_S on
EDGE_HZ = 15720  # upper band limit


def record(dry):
    """Linear filtering: the microphone loses the deepest bass, a bass cut switches in, the top is limited."""
    heard = signal.sosfilt(signal.butter(2, 40, "high", fs=SR, output="sos"), dry)
    bass = signal.oaconvolve(heard, signal.firwin(1023, CUT_HZ, fs=SR)[None], "same")
    switched = np.clip((np.arange(N) / SR - CUT_S) / .005, 0, 1)  # over 5 ms
    cut = heard + (gain_of(CUT_DB) - 1) * switched * bass
    band = signal.firwin(511, EDGE_HZ, window=("kaiser", 9), fs=SR)
    return signal.oaconvolve(cut, band[None], "same")


dry = scene()
out = record(dry)
log_audio(out)
```